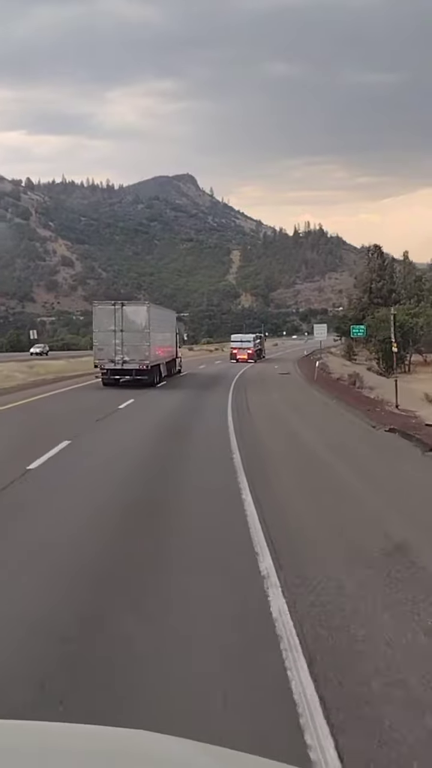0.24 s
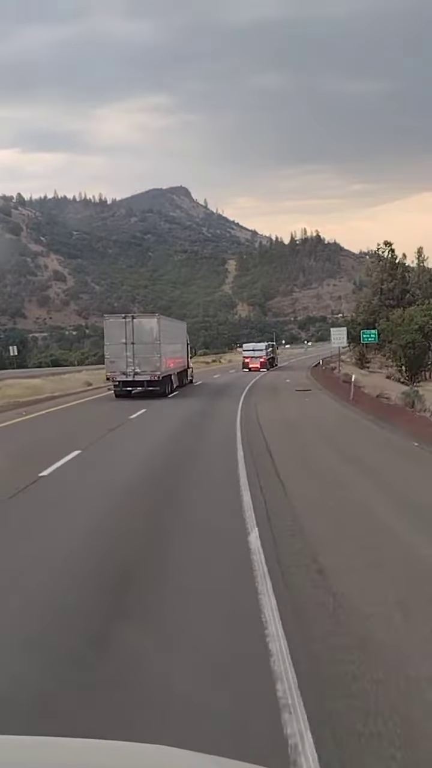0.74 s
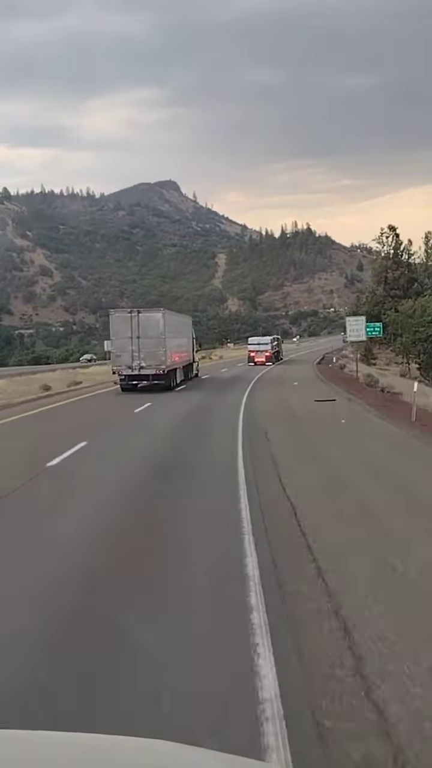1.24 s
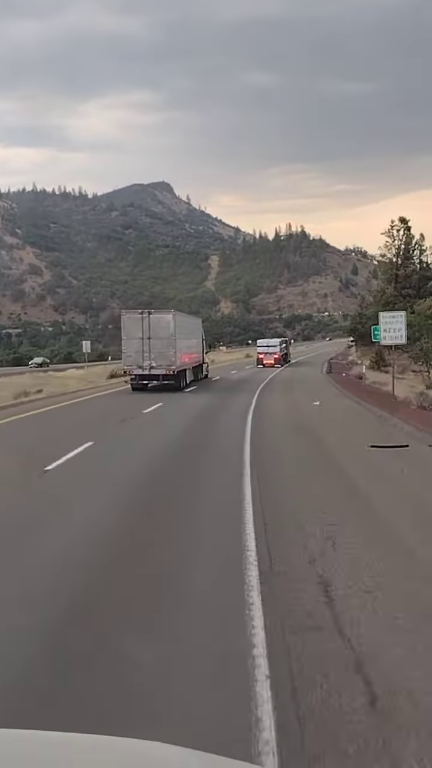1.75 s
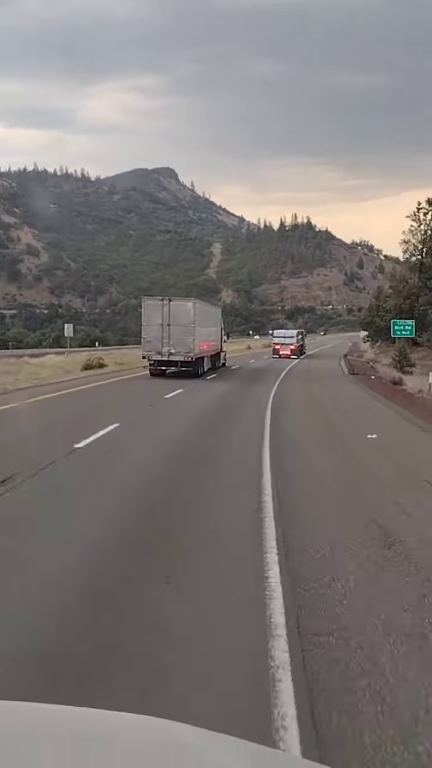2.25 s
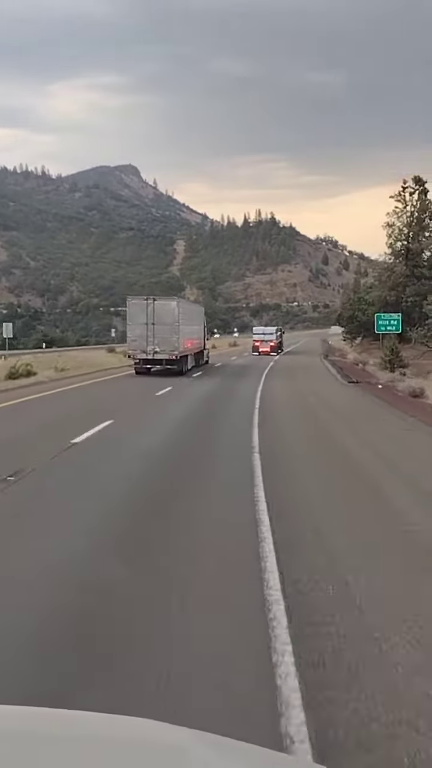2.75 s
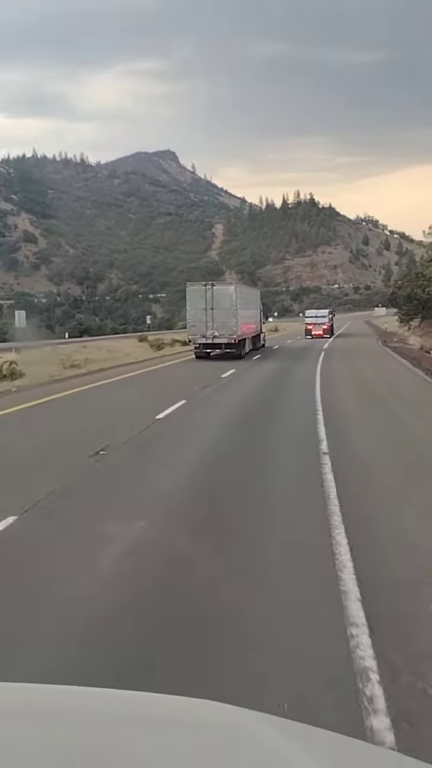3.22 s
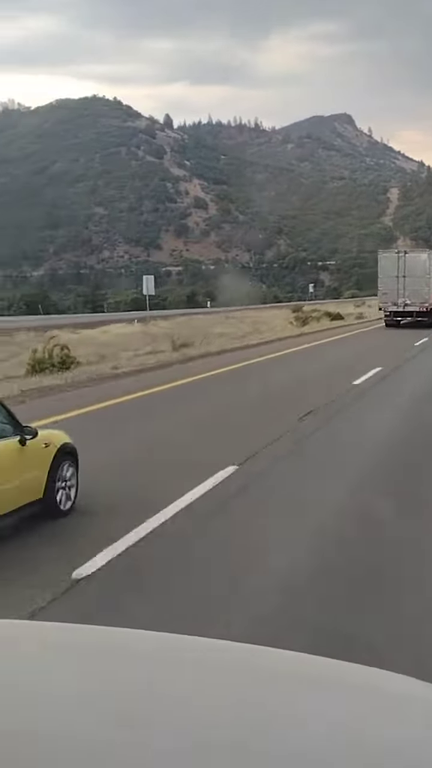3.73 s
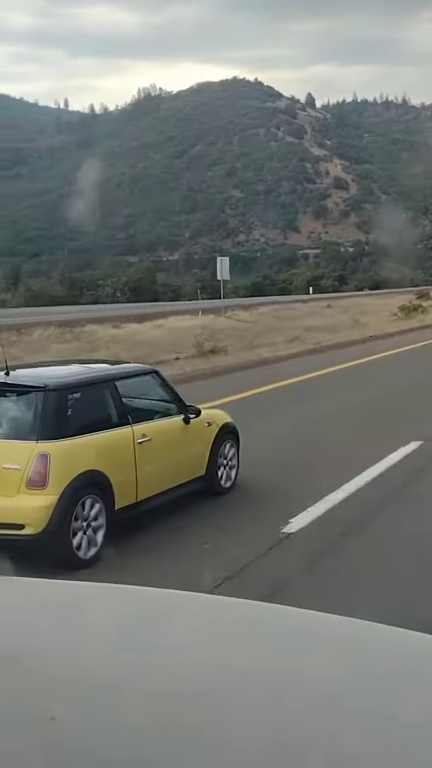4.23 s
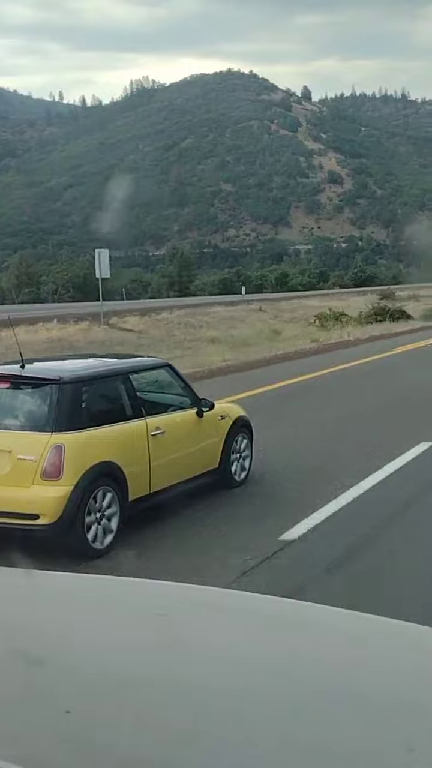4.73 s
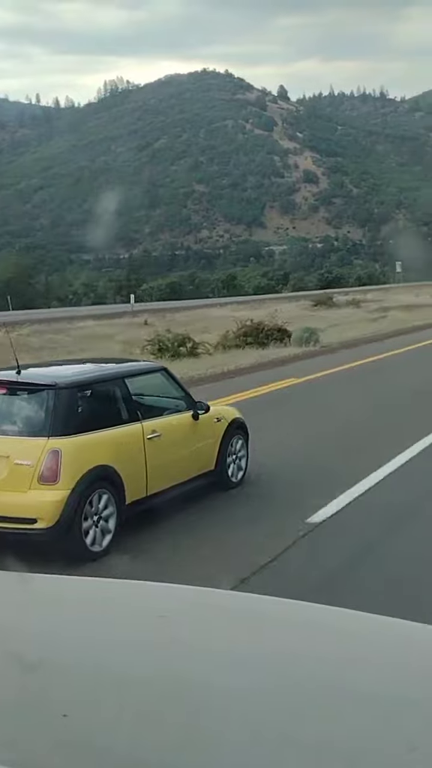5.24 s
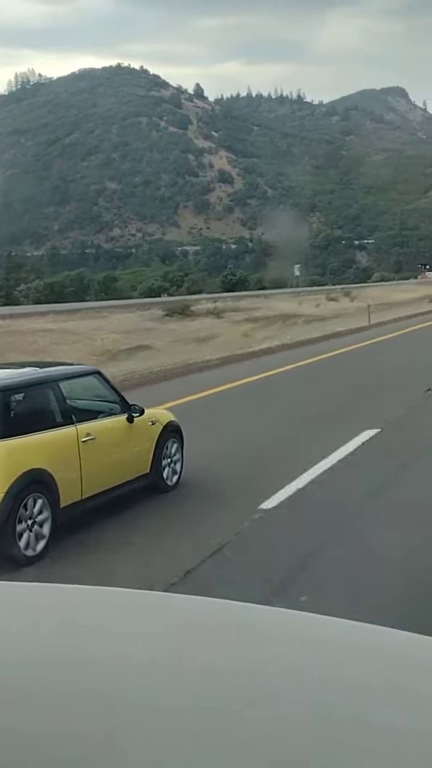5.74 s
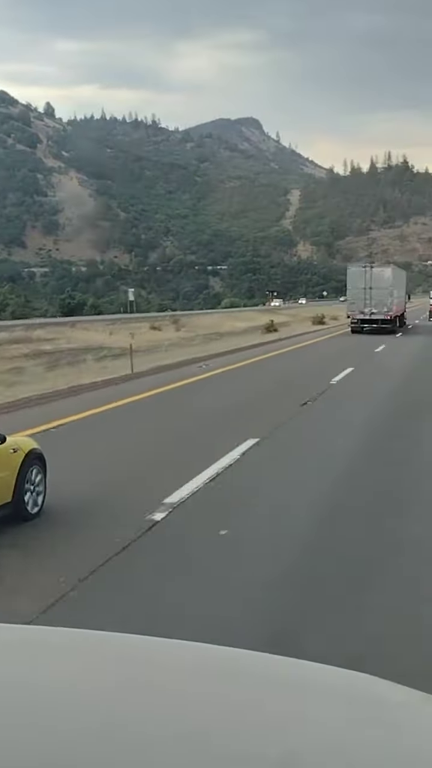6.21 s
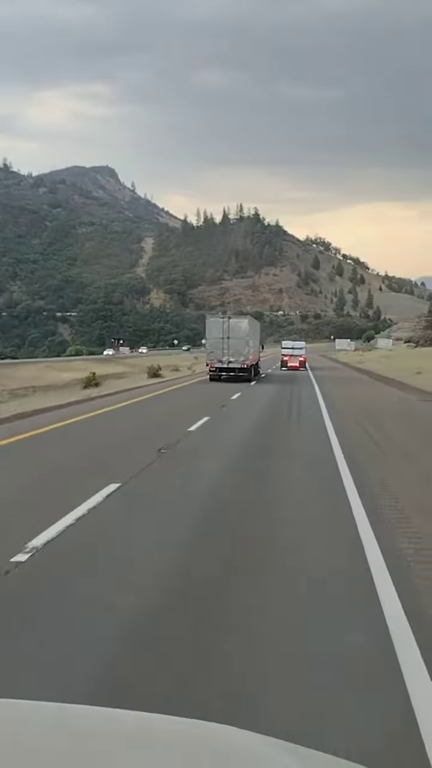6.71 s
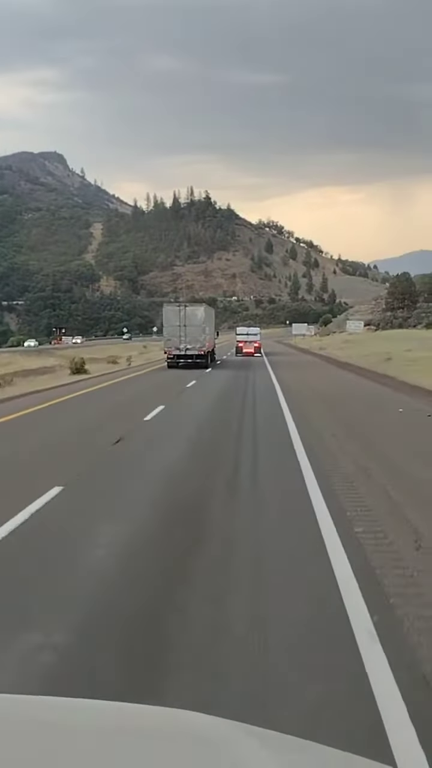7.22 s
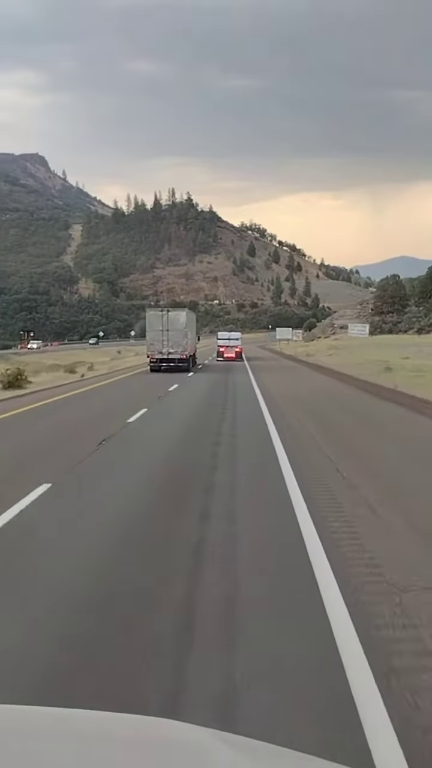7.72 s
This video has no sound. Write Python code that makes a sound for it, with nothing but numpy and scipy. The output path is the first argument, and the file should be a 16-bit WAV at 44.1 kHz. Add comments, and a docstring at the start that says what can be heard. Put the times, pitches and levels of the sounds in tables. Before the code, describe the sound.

Heard from the seat of a heavy truck cruising on a highway: a deep diesel hum, barely rising in revs, with fast clatter and knocking beneath broad tyre and wind roar. The hum pulses early, tyres drone on ribbed pavement, a faint air puff hisses, then two trim clicks snap midway. Near the end a loose part chirps faintly.

```python
"""In the cab of a heavy truck at highway speed, microphone at the seat, a six-cylinder diesel slowly gains revs.
From the start its orders boom over clatter, a knock once a cycle, a faint turbo whistle, and tyre and wind roar;
the low hum surges and dips in the first second and a half. Then tyres drone on ribs and a puff of air hisses.
At 3.4 s trim clicks as the microphone starts its turn to the side window and back; a soft click comes near 6.1 s.
Road noise swells in passing from 1 to 6.5 s; a loose part chirps at the end. Tones, pulses and shaped noise make it."""
import sys
import numpy as np
from scipy.fft import rfft, irfft, next_fast_len
from scipy.io import wavfile
from scipy.ndimage import map_coordinates

SR = 44100
rng = np.random.default_rng(int(sys.argv[2]) if len(sys.argv) > 2 else 0)


def wrap_up_sound(samples):
    """Save the sound to the file named by the first command line argument, as 16-bit audio."""
    columns = np.atleast_2d(samples).T
    # keep every value between -1 and 1, then stretch to whole-number steps
    tamed = np.clip(columns, -1, 1)
    steps = np.round(tamed * 32767).astype(np.int16)
    wavfile.write(sys.argv[1], SR, steps)


N = 351477
TIME = np.arange(N) / SR

# The engine gains speed ever more slowly: revs at first, their gain, share of that first gain lost each second.
START_RPM, GAIN_RPM_PER_S, EASING_PER_S = 1846.1, 6.15, .062
# Seconds until the engine pulls fully.
PULL_S = 4.3
# Firing tone in the cab. Each row: time in seconds, level in dB.
FIRING_LEVEL = [(1.0, -31), (1.8, -33), (3.2, -30.5), (4.1, -28), (5.15, -32), (6.4, -29.5), (7.4, -32.5)]
# Brief surges and dips of the low hum, where tyre and firing tones beat.
# Each row: centre in seconds, gain in dB, half-length in seconds.
LOW_HUM_SURGES = [(0.164, 6.5, 0.056), (0.318, -5, .05), (.75, -13, 0.071), (0.913, 7.5, 0.076),
                  (1.473, 8, 0.052)]
# The firing tone's octave, which fades and returns. Each row: time in seconds, level in dB.
OCTAVE_LEVEL = [(1.5, -29.5), (2.2, -41), (4.2, -36), (5.4, -43), (6.0, -35), (7.0, -31)]
# Tones of unequal cylinders and gears. Each row: multiple of the four-stroke cycle rate, dB at first, dB when pulling.
ENGINE_ORDERS = [(3, -42, -41), (7, -39, -40), (8, -42, -38), (9, -39, -36), (10, -39, -36), (13, -51, -40),
                 (14, -41, -37), (15, -56, -43), (18, -41, -43), (19, -34.5, -37), (20, -50, -50),
                 (21, -41.5, -43), (22, -46, -42), (24, -40.5, -41.5), (29, -56, -51), (30, -52, -46),
                 (31, -45, -50), (32, -54, -50), (33, -49.5, -47), (37, -57, -49.5), (38, -53, -52),
                 (39, -51, -48), (42, -53, -53), (44, -62, -51), (45, -49.5, -49), (46, -56, -54),
                 (47, -58, -53), (49, -56, -56), (55, -64, -53), (56, -54, -56), (59, -61, -56),
                 (65, -57, -54), (67, -58, -56), (68, -54, -53), (69, -58, -55), (71, -59, -52),
                 (75, -60, -56), (78, -64, -54), (80, -59, -58), (150, -72, -65), (170, -74, -66)]
# Engine clatter through the firewall. Each row: frequency in Hz, relative level in dB.
CLATTER_SPECTRUM = [(400, -23.5), (500, -8.5), (600, -7.5), (690, -7), (800, -8.5), (1080, -9), (1400, -17),
                    (2050, -28), (2350, -21), (2750, -24), (3200, -28), (4400, -39), (8000, -51)]
# Ring of the knock. Each row: frequency in Hz, relative level in dB, time to fall by 60 dB in seconds.
KNOCK_MODES = [(480, -1, .024), (690, -2, .022), (880, -4, .02), (1070, -3.5, .022), (1230, -8, .018)]
# The knock hardens as the engine pulls: level at first and its growth, in dB.
KNOCK_DB, KNOCK_GROWS_DB = -48, 6
# Panels shaken by the combustion rasp. Each row: frequency in Hz, width in Hz of each of two passes,
# relative dB facing ahead, relative dB facing the side window.
CAB_PANELS = [(1852, 140, 2, 6.5), (2301, 250, 0.5, 1.5), (2784, 288, -1.5, 2), (3500, 180, -4, -23),
              (3636, 170, -2.5, -7), (4239, 170, -9.5, -6)]
# The microphone turns to the side window and back: start, attack, hold, release, all in seconds.
MICROPHONE_TURN = (3.4, 0.88, 1.6, .8)
# Turbocharger: pitch at the starting revs, its rise with the revs, its mean level in dB.
TURBO_HZ, TURBO_HZ_PER_RPM, TURBO_DB = 11700, 2.5, -77.5
# Tyres on the ribs. Each row: multiple of the rib rate, level in dB, then start, attack, hold, release in seconds.
RIB_TONES = [(1, -27.5, 1.55, .5, 0.17, 0.51), (1, -30, 2.28, 0.71, 0.21, 1.3),
             (2, -22.5, 1.27, 0.53, 0.759, 0.63), (4, -38.5, 1.59, 0.67, 0.417, 0.51)]
# The rib tone lies this far under the firing tone; a moment when the two add up.
BEAT_HZ, BEAT_CREST_S = 3.35, 2.585
# Plastic trim clicks. Each row: time in seconds, peak level in dB, frequency in Hz above which the ring is dulled.
TRIM_CLICKS = [(3.373, -21, 7500), (3.4918, -20.5, 3600), (3.498, -30, 2800), (6.1155, -34.5, 12000)]
# Ring of the trim. Each row: frequency in Hz, relative level in dB, time to fall by 60 dB in seconds.
TRIM_MODES = [(1100, -3, .006), (1800, -1, .007), (2600, 1, .007), (3500, -6, .005), (4500, -3, .005),
              (5400, -3, .005), (6800, -8, .004)]
# Chirps of a loose part. Each row: start in seconds, length in seconds, frequency in Hz, level in dB.
CHIRPS = [(7.577, .02, 2040, -46), (7.596, .018, 2020, -48.5), (7.606, .014, 3100, -54),
          (7.615, .012, 2680, -53), (7.615, .028, 1880, -48), (7.636, .01, 2950, -56)]
# Soft rub of the loose part: level in dB, then start, attack, hold, release in seconds.
LOOSE_RUB = (-52.5, 7.53, .07, .04, .09)
# Tyre and wind roar. Each row: frequency in Hz, relative level in dB.
ROAD_SPECTRUM = [(22, -8), (33, -13), (50, -2), (100, -1), (160, -1), (230, -6.3), (310, -8.5), (355, -6.5),
                 (405, -12.3), (560, -14.2), (690, -16.3), (830, -19.5), (1080, -20), (1250, -24),
                 (1480, -27.7), (1750, -32.8), (2100, -39), (4000, -65.5)]
# Road noise on coarse asphalt, and how far each part drops on the smooth stretch, in dB.
RUMBLE_DB, ROAR_DB, RUMBLE_DROP_DB, ROAR_DROP_DB = -26, -25.5, 0.5, 3.5
# Smooth, finely ribbed pavement: start, attack, hold, release, all in seconds.
SMOOTH_STRETCH = (1.5, 0.58, 0.22, 0.95)
# Passing swells of road noise: narrow tread hum, broad roar and a low cab boom. Each row: frequency in Hz,
# width in Hz of each of two passes, level in dB, then start, attack, hold, release in seconds.
ROAD_SWELLS = [(440, 10, -39, 1.0, .3, .4, .4), (640, 70, -43, 1.1, .2, .15, .2),
               (1100, 250, -49, 2.4, .5, 1.1, .5), (443, 10, -38, 2.9, .3, .6, .7),
               (650, 130, -45, 3.1, .3, .4, .5), (280, 25, -38, 3.2, .3, .5, .3),
               (440, 60, -41, 4.5, .4, .6, .5), (160, 60, -32, 4.7, .3, 1.3, .5)]
# Air past the doors and through the vents. Each row: frequency in Hz, relative level in dB.
AIR_SPECTRUM = [(500, -7.5), (1800, 1), (2050, -1.5), (4000, -10.5), (5200, -9), (6000, -14.5),
                (9300, -15.5), (10600, -24), (14000, -21)]
# A short puff of air: level in dB, start, attack and hold in seconds, seconds to fall by 20 dB.
AIR_PUFF = (-55.8, 1.805, .135, .035, .27)
# The phone's band limit.
TOP_HZ = 13950


def engine(cycle, lope_db=2.2, lope_place=0.85, clatter_db=-42.5, rasp_db=-55.0):
    """The diesel: everything follows the crank; the clatter heaves once a cycle."""
    pull = np.minimum(TIME / PULL_S, 1)
    aside = swell(*MICROPHONE_TURN)
    knock_db = KNOCK_DB + KNOCK_GROWS_DB * pull
    heave_db = lope_db * np.cos(2 * np.pi * (cycle - lope_place))
    metal = amp(clatter_db + heave_db) * clatter(cycle) + amp(knock_db) * knock(cycle)
    return boom(cycle, pull) + metal + amp(rasp_db) * rasp(cycle, aside)


def boom(cycle, pull, waver_db=0.8):
    """Six firings a cycle make the main hum; unequal cylinders and gears fill in other multiples."""
    (firing_db,), (octave_db,) = curves(FIRING_LEVEL), curves(OCTAVE_LEVEL)
    surge_db = sum(db * np.exp(-((TIME - s) / width) ** 2) for s, db, width in LOW_HUM_SURGES)
    hum = amp(firing_db + surge_db) * cosine(6 * cycle)
    hum += amp(octave_db) * cosine(12 * cycle)
    for multiple, first_db, pulling_db in ENGINE_ORDERS:
        level_db = first_db + pull * (pulling_db - first_db) + waver_db * wobble(1.7)
        hum += amp(level_db) * tone(multiple * cycle)
    return hum


def clatter(cycle, size=4096):
    """Valves, gears and injectors repeat one pattern every cycle, drifting slowly between two variants."""
    shape = (2, size // 2 + 1)
    magnitude = amp(rng.uniform(-6, 6, shape))
    phase = 2 * np.pi * rng.random(shape)
    patterns = irfft(magnitude * np.exp(1j * phase))
    first, second = (np.interp(cycle, np.arange(size) / size, p, period=1) for p in patterns)
    blend = .2 * (TIME + wobble(1))
    return coloured(np.cos(blend) * first + np.sin(blend) * second, CLATTER_SPECTRUM)


def knock(cycle, place=.86, attack=0.0036, rattle_db=-3, rattle_t60=0.056):
    """One cylinder knocks louder, once every two crank turns: a ring and a loose rattle, never twice alike."""
    count = np.floor(cycle - place + 1).astype(int).clip(0)
    age = (cycle - place) % 1 / np.gradient(cycle, TIME)  # seconds since the last knock
    chance_db = 1.5 * rng.standard_normal((len(KNOCK_MODES), N // 100))  # per mode and knock
    ring = np.zeros(N)
    for k, (hz, db, t60) in enumerate(KNOCK_MODES):
        fading = amp(db + chance_db[k][count] - 60 * age / t60)
        ring += (-1) ** k * fading * np.sin(2 * np.pi * hz * age)
    loose = coloured(noise(), [(250, -24.0), (500, 4.5), (1200, -4.5), (1700, -12.0), (3000, -39)])
    rattle = loose * amp(-60 * age / rattle_t60)
    rise = 1 - np.exp(-(age / attack) ** 2)
    return unit(unit(ring * rise) + amp(rattle_db) * unit(rattle * rise))


def rasp(cycle, aside, depth=0.35):
    """Combustion noise swells at every firing and rattles panels, rebalanced as the microphone turns."""
    firing = np.cos(2 * np.pi * 6 * cycle)
    shaking = noise() * (1 + depth * firing)
    ahead = resonant(shaking, [(hz, width, db) for hz, width, db, _ in CAB_PANELS])
    side = resonant(shaking, [(hz, width, db) for hz, width, _, db in CAB_PANELS])
    return (1 - aside) * ahead + aside * side


def turbo(rpm):
    """The compressor blades whistle thinly and a little unsteadily, rising with the revs."""
    hz = TURBO_HZ + TURBO_HZ_PER_RPM * (rpm - START_RPM)
    flutter_hz = 32 * wobble(110)
    return amp(TURBO_DB + 2.5 * wobble(11)) * tone(np.cumsum(hz + flutter_hz) / SR)


def drone(cycle):
    """The tyres hum on ribbed pavement just under the firing tone, and beat against it."""
    turns = 6 * cycle - BEAT_HZ * (TIME - BEAT_CREST_S)
    return sum(amp(db) * swell(*shape) * cosine(multiple * turns) for multiple, db, *shape in RIB_TONES)


def clicks(attack=.0003):
    """The plastic trim snaps and rings for a few milliseconds; a duller snap loses its upper modes."""
    out, age = np.zeros(N), np.arange(SR // 20) / SR
    for s, peak_db, bright_hz in TRIM_CLICKS:
        ring = np.zeros(len(age))
        for k, (hz, db, t60) in enumerate(TRIM_MODES):
            fading = amp(db - 60 * age / t60) / (1 + (hz / bright_hz) ** 4)
            ring += (-1) ** k * fading * np.sin(2 * np.pi * hz * age)
        ring *= 1 - np.exp(-age / attack)
        out[round(s * SR):][:len(age)] += amp(peak_db) * ring / np.abs(ring).max()
    return out


def squeaks(unsteady=0.047):
    """A loose part rubs softly and gives a quick run of tiny, rough chirps."""
    bent_time = np.cumsum(1 + unsteady * wobble(300)) / SR  # makes every chirp's pitch unsteady
    rub_db, *shape = LOOSE_RUB
    out = amp(rub_db) * swell(*shape) * resonant(noise(), [(2000, 400, 0), (3000, 800, -6)])
    for s, length, hz, db in CHIRPS:
        out += amp(db) * swell(s, length / 3, length / 3, length / 3) * tone(hz * bent_time)
    return out


def road(split_hz=350, grain_db=0.56, tread_db=-46):
    """Bumps swell the rumble, coarse asphalt the roar; smooth pavement eases both; tread hum and swells add in."""
    smooth = swell(*SMOOTH_STRETCH)
    rumble_db = RUMBLE_DB - RUMBLE_DROP_DB * smooth + .7 * wobble(6)
    roar_db = ROAR_DB - ROAR_DROP_DB * smooth + grain_db * wobble(14)
    rolling = coloured(noise(), ROAD_SPECTRUM)
    rumble = filtered(rolling, lambda hz: 1 / (1 + (hz / split_hz) ** 4))
    roar = rolling - rumble
    out = amp(rumble_db) * rumble + amp(roar_db) * roar
    out += amp(tread_db) * resonant(noise(), [(441, 8, 0)])
    for hz, width, db, *shape in ROAD_SWELLS:
        out += amp(db) * swell(*shape) * resonant(noise(), [(hz, width, 0)])
    return out


def air():
    """Steady wind hiss round the cab, and one short, sputtering puff as from an air valve, which trails away."""
    puff_db, start, attack, hold, fall = AIR_PUFF
    rise = np.clip((TIME - start) / attack, 0, 1) ** 1.5
    fade_db = -20 * np.maximum(TIME - start - attack - hold, 0) / fall
    jet = coloured(noise(), [(1500, -29), (4000, -6.5), (7000, -2.0), (10000, -8), (12500, -13.0), (14000, -18)])
    puff = amp(puff_db + fade_db + wobble(90)) * rise * jet
    wind = amp(-54.5 + 0.34 * wobble(10)) * coloured(noise(), AIR_SPECTRUM)
    return wind + puff


def amp(db):
    """Decibels to gain."""
    return 10 ** (np.asarray(db) / 20)


def unit(x):
    """Scale to rms 1."""
    return x / np.sqrt(np.mean(x ** 2) + 1e-20)


def curves(rows):
    """One value per sample for each column after the time."""
    s, *cols = np.transpose(rows)
    return [np.interp(TIME, s, c) for c in cols]


def swell(start, attack, hold, release):
    """A smooth rise from 0 to 1, a hold and a smooth fall."""
    end = start + attack + hold + release
    ramp = np.minimum((TIME - start) / attack, (end - TIME) / release)
    return np.sin(np.pi / 2 * np.clip(ramp, 0, 1)) ** 2


def wobble(rate):
    """A smooth random curve, rate knots a second."""
    return map_coordinates(rng.standard_normal(int(N * rate / SR) + 4), [TIME * rate])


def noise():
    """Fresh white noise."""
    return rng.standard_normal(N)


def cosine(turns):
    """A cosine of rms 1."""
    return np.sqrt(2) * np.cos(2 * np.pi * turns)


def tone(turns):
    """A cosine of rms 1, starting anywhere in its cycle."""
    return cosine(turns + rng.random())


def filtered(x, response):
    """x times a response of frequency."""
    m = next_fast_len(N + SR // 2)
    return irfft(rfft(x, m) * response(np.fft.rfftfreq(m, 1 / SR)), m)[:N]


def coloured(x, points):
    """x shaped by (Hz, dB) points on a log axis, at rms 1."""
    f, db = np.transpose(points)
    return unit(filtered(x, lambda hz: amp(np.interp(np.log(hz + 1), np.log(f), db))))


def resonant(x, modes):
    """x through (Hz, width, dB) resonances, each squared for steep skirts, at rms 1."""
    def response(f):
        return sum(amp(db) * (1j * f * w / (c * c - f * f + 1j * f * w)) ** 2 for c, w, db in modes)
    return unit(filtered(x, response))


def scene():
    """All that is heard from the seat; the crank turns twice in a cycle."""
    rpm = START_RPM + GAIN_RPM_PER_S * TIME * (1 - EASING_PER_S * TIME / 2)
    cycle = np.cumsum(rpm) / (2 * 60 * SR)
    return (engine(cycle) + turbo(rpm) + drone(cycle) + clicks() + squeaks() + road() + air())[None]


def record(dry):
    """The phone keeps nothing above its band limit."""
    return filtered(dry[0], lambda hz: hz < TOP_HZ)[None]


dry = scene()
out = record(dry)
wrap_up_sound(out)
```